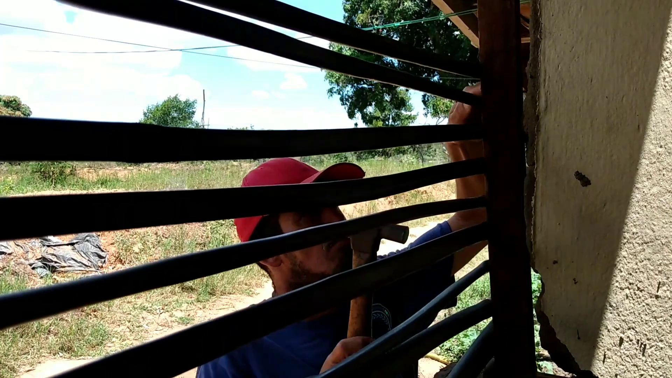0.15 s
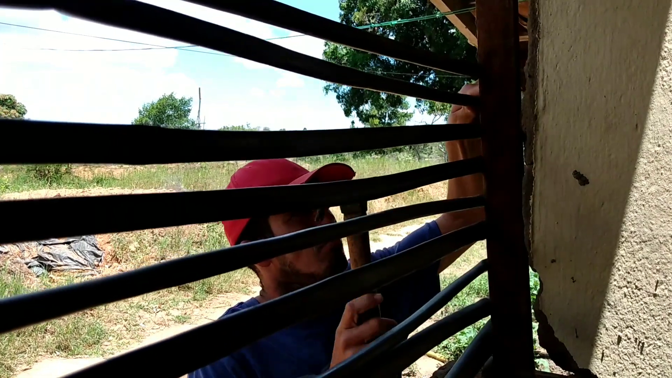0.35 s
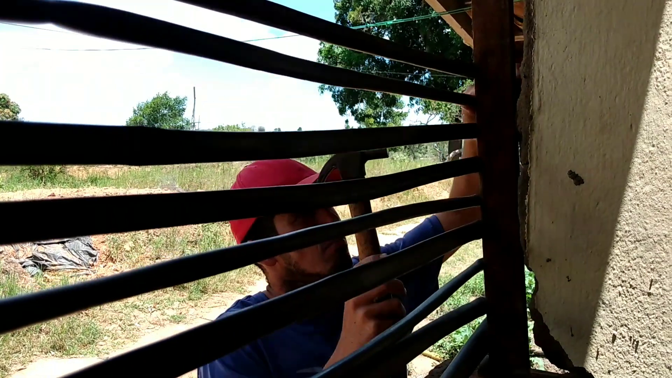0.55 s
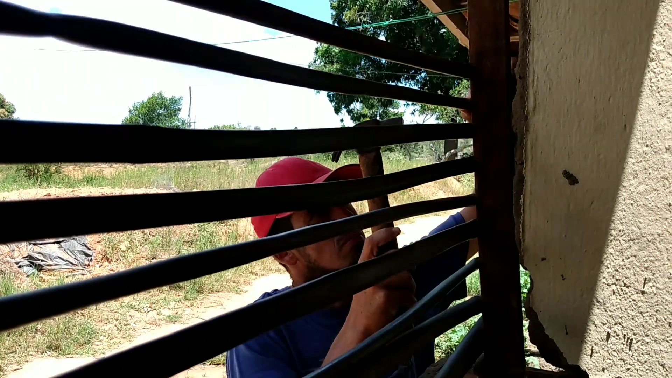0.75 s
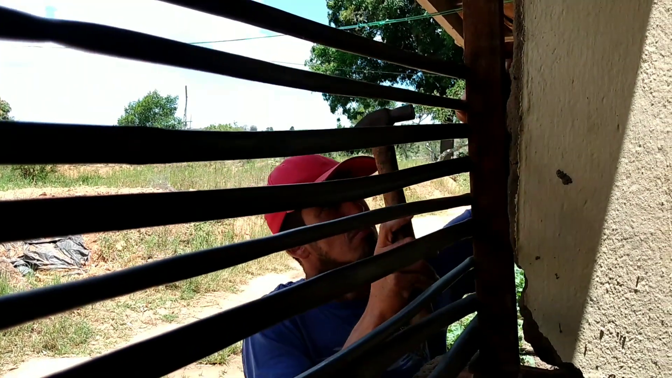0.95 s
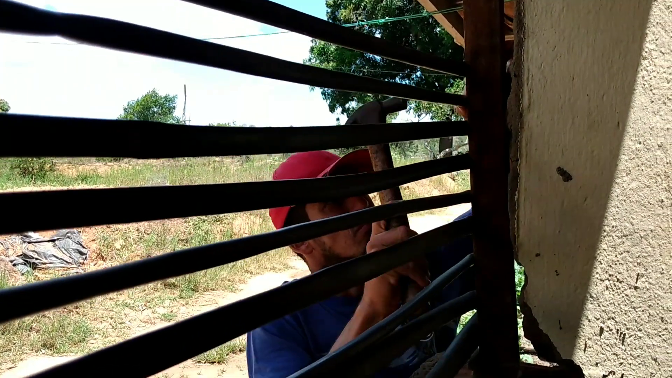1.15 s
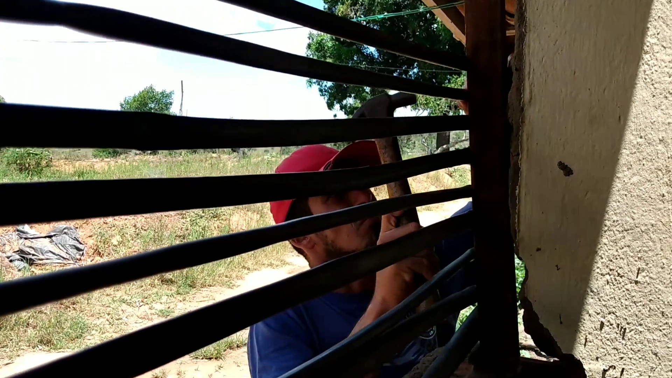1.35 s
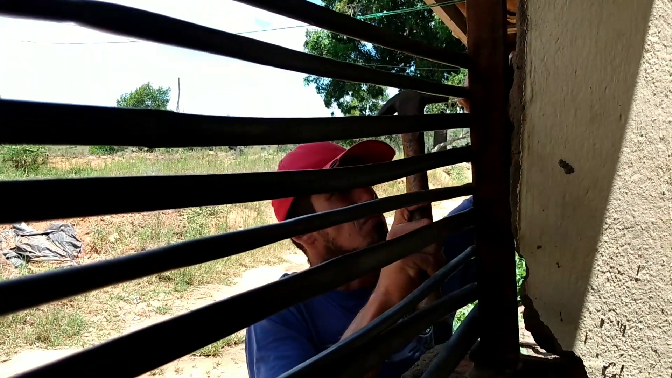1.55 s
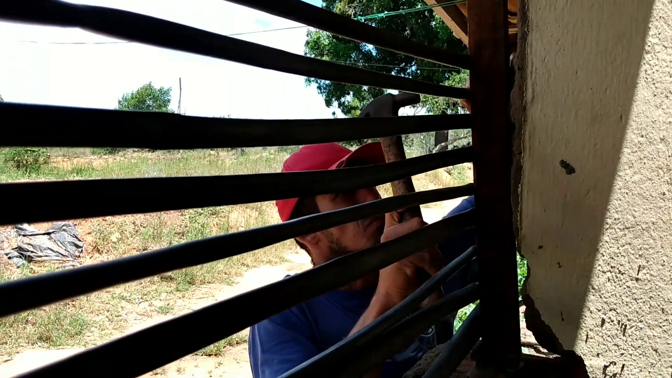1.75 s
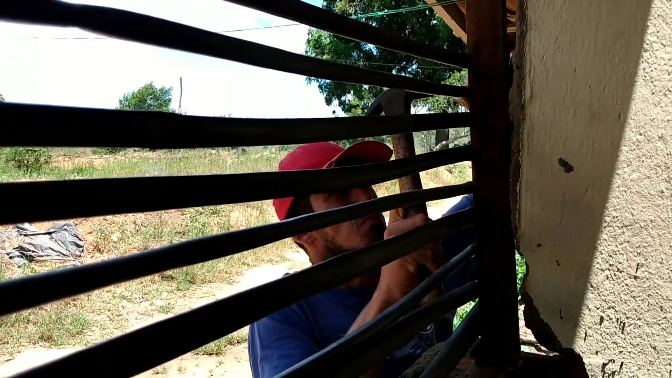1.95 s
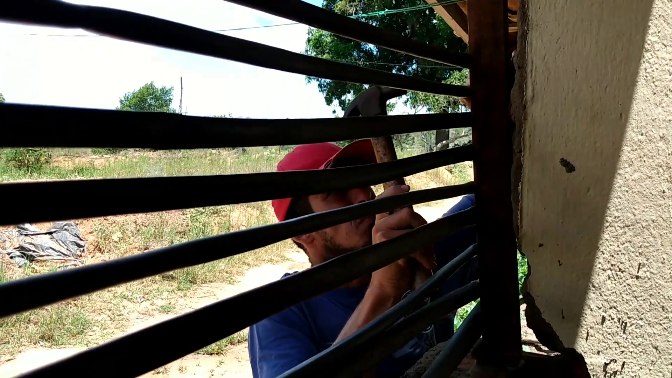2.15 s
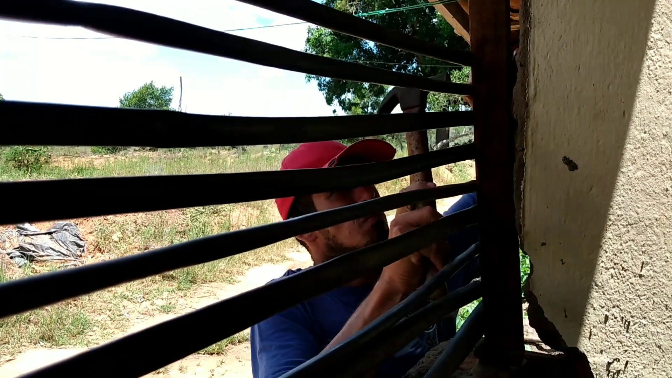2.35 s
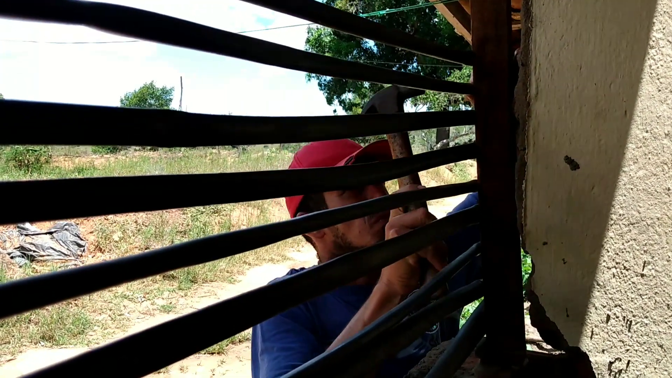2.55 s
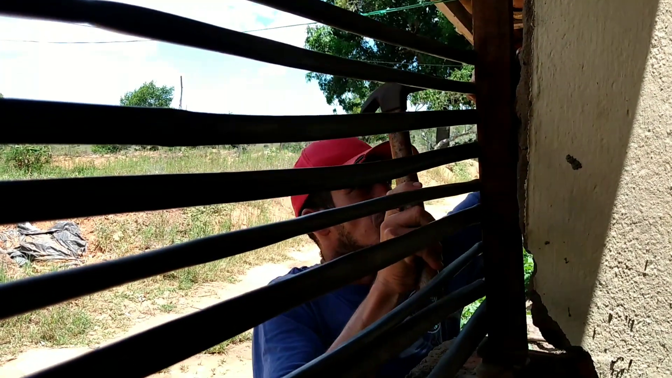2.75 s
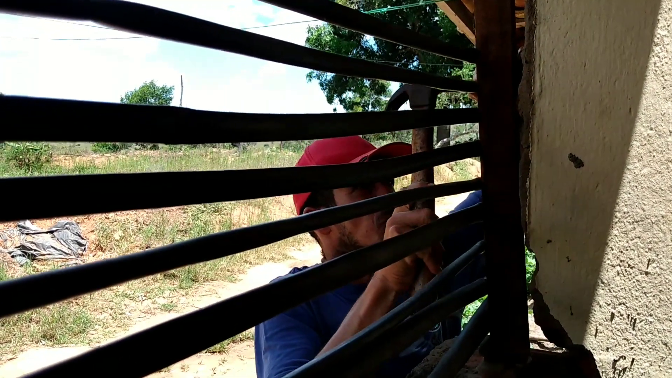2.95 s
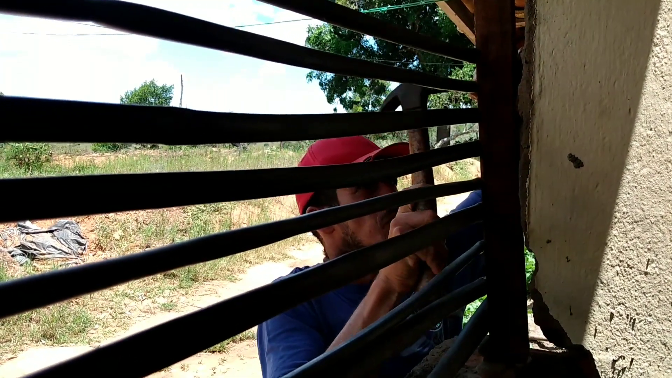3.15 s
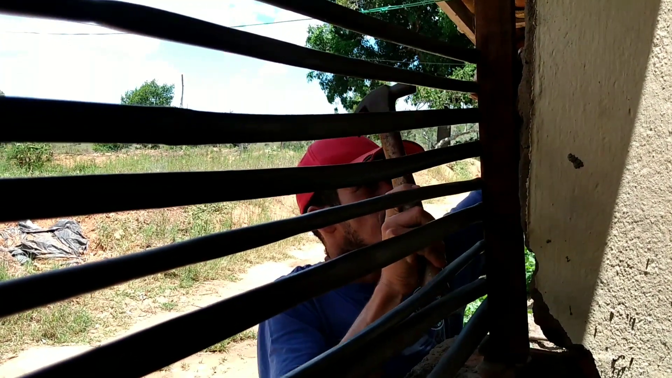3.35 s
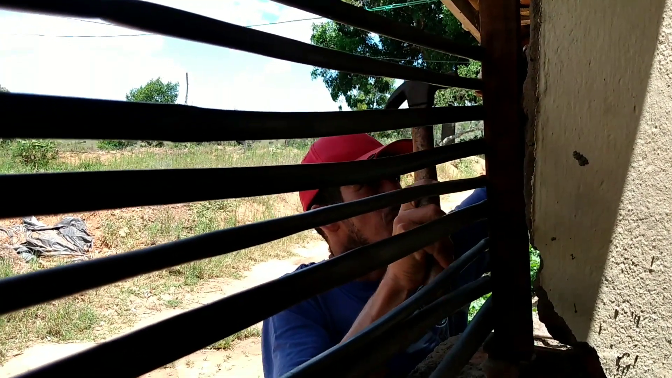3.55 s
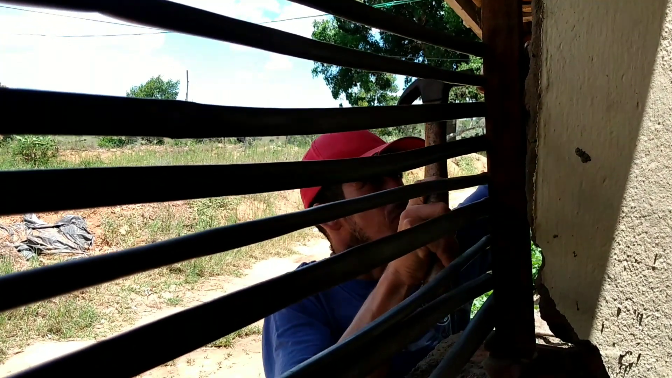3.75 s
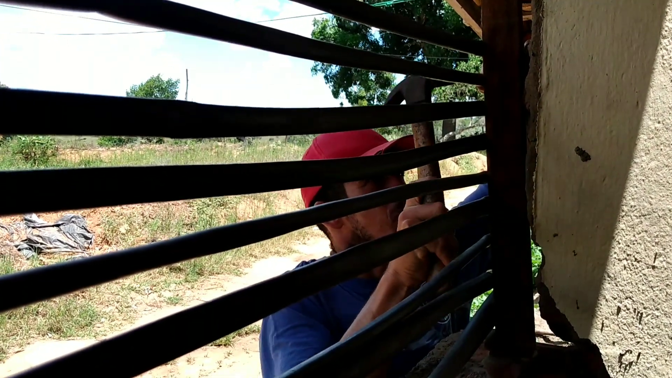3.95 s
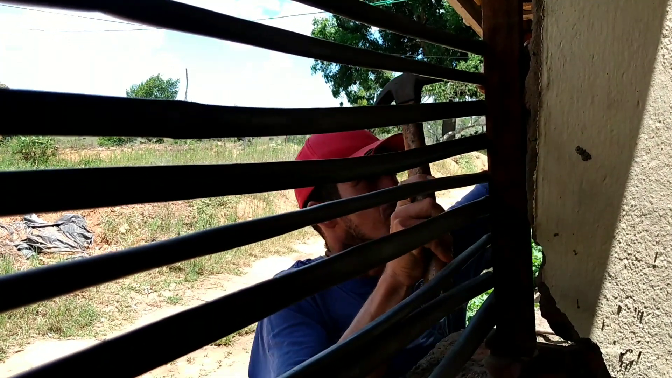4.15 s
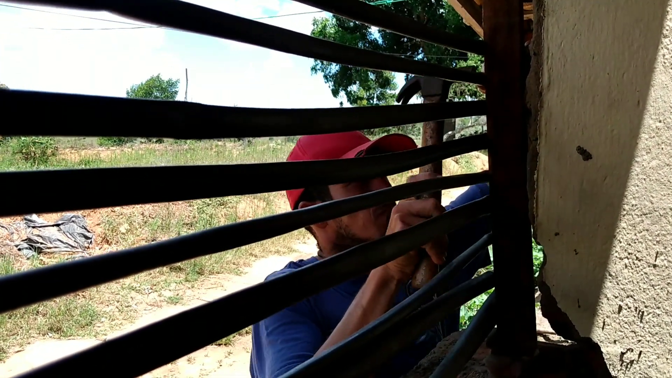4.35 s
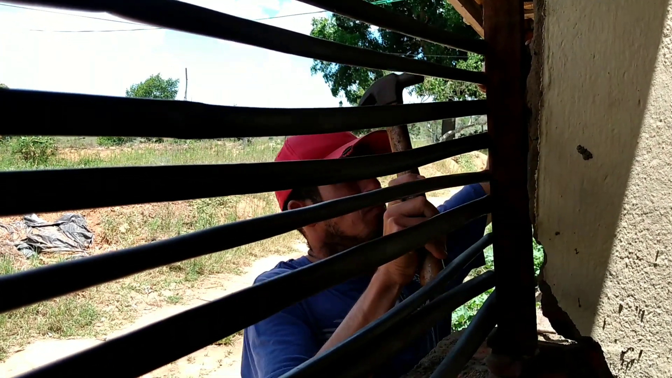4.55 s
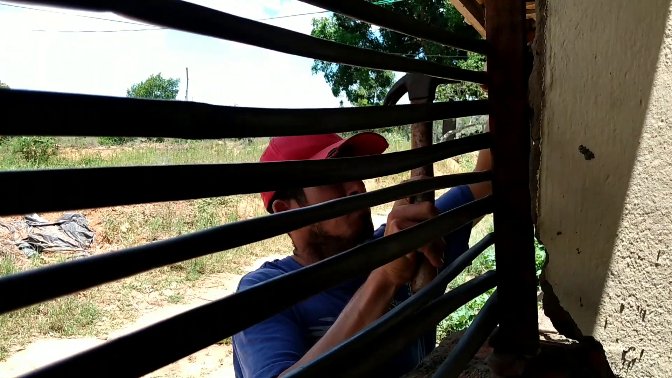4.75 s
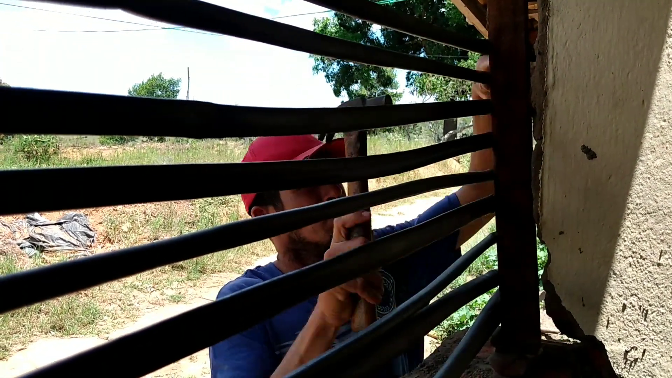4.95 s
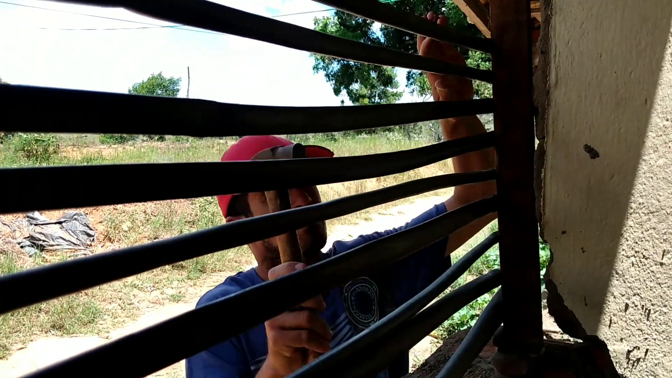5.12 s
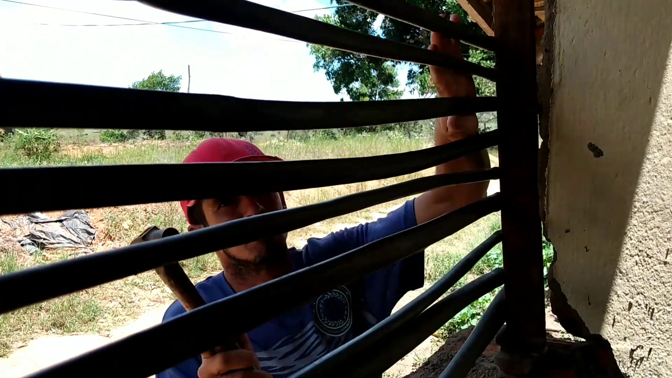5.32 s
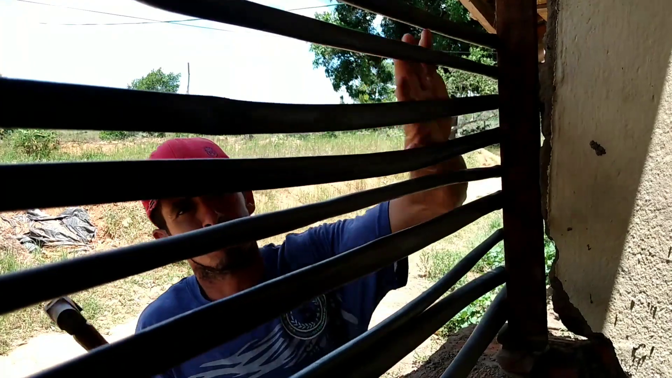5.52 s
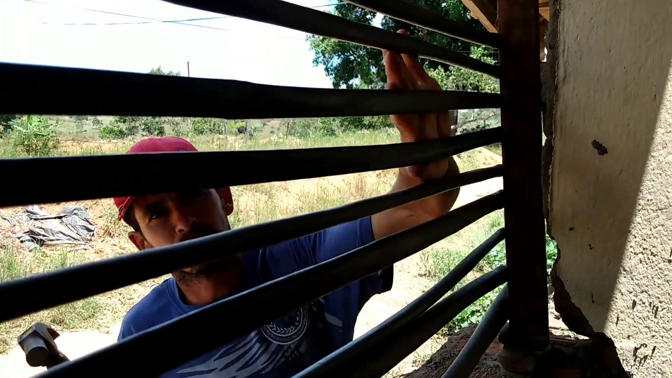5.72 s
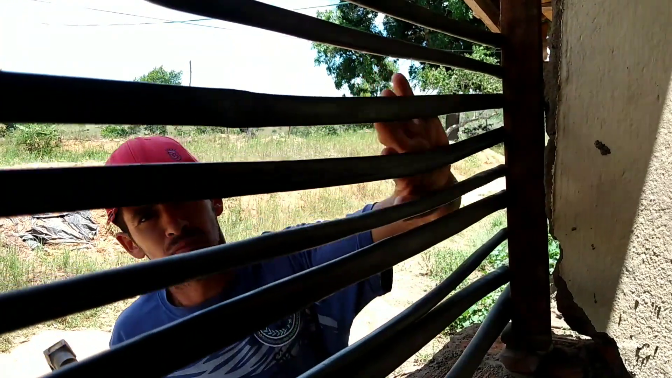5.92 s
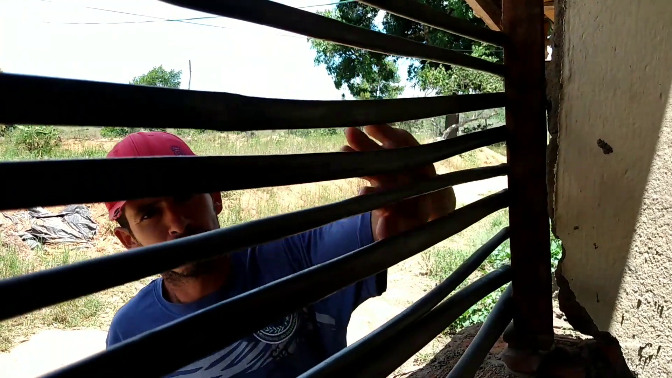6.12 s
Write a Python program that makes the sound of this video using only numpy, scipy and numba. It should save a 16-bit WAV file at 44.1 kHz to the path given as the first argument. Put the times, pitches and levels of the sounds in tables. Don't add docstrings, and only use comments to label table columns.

```python
import sys
import numpy as np
from scipy import signal
from scipy.fft import rfft, irfft
from scipy.io import wavfile
from scipy.ndimage import uniform_filter1d
from numba import njit

SR = 44100
rng = np.random.default_rng(int(sys.argv[2]) if len(sys.argv) > 2 else 0)


def magnitude_from_level(level_db):
    exponent = np.asarray(level_db, float) / 20
    return 10 ** exponent


def output_pcm(signal):
    pcm = np.clip(np.atleast_2d(signal).T, -1, 1) * 32767
    wavfile.write(sys.argv[1], SR, np.round(pcm).astype(np.int16))


N = 272538
TIME = np.arange(N) / SR

# pitch_hz, density_db (per Hz)
QUIET = [(71, -4), (120, -9), (289, -4.5), (436, -9.5), (473, -5), (1260, -13), (2200, -17.5),
         (3240, -22.5), (11300, -17), (16000, -24)]
QUIET_DB = -62.5
# pitch_hz, density_db (per Hz)
LEAVES = [(100, -6.5), (300, -6), (900, -7.5), (1500, -8), (2300, -7.5), (3400, -7.5), (4800, -5.5),
          (6600, -5.5), (8200, -9), (10800, -5.5), (14000, -13.5), (16000, -11)]
# start_s, length_s, level_db, treble_over_level_db
RUSTLES = [(0, .28, -52, -4.5), (.08, 0.042, -49, -3), (.2, 0.053, -48, -6.5), (.72, .5, -58.5, -15),
           (1.5, .3, -59.5, -17), (0.495, 0.21, -55, -13.5), (0.964, 0.057, -54.5, -11),
           (1.415, 0.05, -51.5, -7), (2.556, 0.025, -54, -13), (1.74, 0.026, -54.5, -12),
           (1.901, 0.21, -52.5, -11), (3.13, 1.78, -53, -13), (4.164, 0.26, -51, -5.5)]
RUSTLE_RISE_DB_S, RUSTLE_FALL_DB_S, STILL_DB, STILL_TREBLE_DB = 113, 160, -67.5, -77
SHIVER_DB, SHIVER_TREBLE_DB = -55, -56.5
SHIVER_FALL_DB_S, SHIVER_TREBLE_FALL_DB_S = 45, 170
# pitch_hz, left_minus_right_db
HISS_BALANCE = [(60, 18), (110, 16), (200, 0.5), (380, -4.5), (700, -5), (1290, -7.5), (2380, -12),
                (4400, -11.5), (8120, -15.5), (15000, -9.5)]

# start_s, length_s, level_db
LEFT_GUSTS = [(0, 0.076, -52), (.22, 0.066, -59), (0.486, 0.047, -49.5), (0.602, 0.072, -48.5),
              (0.88, 0.089, -48), (1.108, 0.034, -57.5), (1.383, 0.095, -57.5), (1.655, 0.083, -51.5),
              (1.856, 0.24, -42.5), (2.483, 0.064, -47), (2.757, 0.18, -56.5), (3.094, 0.43, -37.5),
              (3.568, 0.091, -34.5), (3.765, .17, -26.5), (3.952, 0.25, -24), (4.252, 0.1, -28.5),
              (4.43, 0.11, -29.5), (4.593, 0.046, -30), (4.708, 0.11, -41), (5.175, 0.11, -55.5),
              (5.38, 0.36, -57), (5.868, 0.0098, -46), (5.971, 0.26, -41)]
RIGHT_GUSTS = [(0, .33, -57), (.45, 0.32, -62), (.87, .28, -61), (1.4, .3, -63), (1.85, .28, -57),
               (2.48, 0.054, -53.5), (2.78, 0.057, -50), (3.15, 0.27, -53), (3.45, 0.017, -46),
               (3.58, 0.081, -40), (3.861, .26, -38), (4.2, 0.16, -36.5), (4.36, 0.12, -39.5),
               (4.6, 0.012, -36.5), (4.78, 0.041, -37), (5.2, .98, -59), (5.45, 0.26, -57)]
GUST_RISE_DB_S, GUST_FALL_DB_S, CALM_DB = 282, 253, -65
# centre_s, level_db, pitch_hz, crest_db
LEFT_EDDIES = [(.503, -44, 78.6, -19), (0.604, -39, 100, -19), (0.96, -33.5, 76, -24.5),
               (1.846, -37, 111, -35), (1.895, -28.5, 84, -48), (2.083, -36, 132, -22),
               (2.55, -40, 86, -44), (3.2, -24.5, 113, -64), (3.231, -22, 110, -81),
               (3.753, -16.5, 115, -25.5), (3.771, -14.5, 179.3, -29.5), (3.866, -17, 191.5, -13),
               (3.882, -11.5, 211, -25.5), (3.902, -15, 87, -15), (3.941, -31.5, 161, -4.5),
               (3.985, -20.5, 133, -12.5), (3.997, -21.5, 132, -5), (4.133, -15.5, 153, -11.5),
               (4.122, -18.5, 158.6, -7.5), (4.17, -13.5, 93, -19.5), (4.189, -17.5, 183, -6),
               (4.257, -16, 147, -18), (4.291, -21.5, 167, -17), (4.433, -12.5, 153, -32),
               (4.451, -19.5, 155, -26), (4.522, -18, 104, -27), (4.536, -21, 160, -21),
               (4.598, -22, 138, -18.5), (4.625, -17, 135, -27), (6.056, -25.5, 76, -34)]
RIGHT_EDDIES = [
    (3.447, -35, 76.6, -38),
    (4.008, -23, 112, -42),
    (4.061, -20, 86, -42),
    (4.212, -21, 84, -40),
    (4.28, -10, 105, -37),
    (4.604, -31, 98, -35),
]
SHED_PER_S, SHED_OVER_GUST_DB, SHED_SCATTER_DB, SHED_HZ, SHED_CREST_DB = 45, 1.5, 5, 93, -30

# start_s, tick_db (steel), knock_db (wood), thud_db (hollow)
BLOWS = [(0.4535, -65, -82, -83), (1.131, -46, -71, -82), (1.654, -43, -60.5, -68),
         (2.0008, -36, -52.5, -52.5), (2.432, -36, -47, -46), (2.718, -29, -41.5, -35.5),
         (3.008, -27.5, -30.5, -29.5), (3.283, -18.5, -23, -24), (3.552, -17, -21, -21.5),
         (3.8187, -17.5, -20.5, -21.5), (4.092, -18.5, -21, -21), (4.3791, -18, -20.5, -22),
         (4.7396, -17, -20, -22)]
# pitch_hz, level_db, t60_s
STEEL = [(8600, -3, .003), (10700, -1, .004), (12600, 1, .003), (14800, 1, .002)]
POST = [(1000, 0, .012), (1300, -1, .008), (1550, -1, .01), (2150, 0, .008), (3020, -2, .016),
        (3800, -7, .005)]
HOLLOW = [(283.7, -4, 0.045), (485, -4.5, 0.026), (673, 2.5, 0.023)]
PLANK = [(165, -1.2, 0.053), (332, -0.72, 0.063)]
PLANK_TOP_DB = -36.5
# pitch_hz, level_db
STEEL_TAIL = [(4000, -30), (6500, -13), (8600, -11), (10700, -2), (13000, -5), (15300, -9), (16000, -40)]
POST_TAIL = [(500, -25), (950, 0), (1500, -2), (1750, -6), (2200, -1), (3100, -4), (4200, -9), (6000, -14),
             (9000, -30)]
HOLLOW_TAIL = [(120, -23.5), (200, -1.5), (300, -3), (470, -1.5), (700, 1.5), (950, -2.5), (1600, -28.5)]
PLANK_TAIL = [(90, -21), (170, 3), (330, 3), (520, -18)]
# delay_s, left_db, right_db
TICK_ECHOES = [(0, 6, 0), (.0024, -3, -1), (.0145, -18, -10), (.0195, -16, -10), (.0485, -17, -12)]
# delay_s, left_db, right_db
KNOCK_ECHOES = [(0, 6, 0), (.0024, -5, -4), (.0052, -8, -4), (.008, -8, -3), (.0275, -8, -5),
                (.031, -10, -8), (.041, -12, -12)]
# pitch_hz, t60_s
YARD = [(250, 0.34), (500, 0.29), (1000, 0.25), (2000, 0.33), (4000, 0.25), (8000, 0.25), (14000, 0.17)]
LEAD = 132
# pitch_hz, left_minus_right_db
BLOW_BALANCE = [(60, 15), (110, -19), (200, -13), (380, -2.5), (700, -5), (1290, -8), (2380, -4),
                (4400, -8.5), (8120, -18.5), (15000, -7)]

# start_s, level_db, treble_over_level_db
SCUFF = [
    (5.07, -60, -12),
    (5.15, -52, -9),
    (5.255, -45, -9.5),
    (5.3, -48.5, -3.5),
    (5.36, -43.5, -3.5),
    (5.399, -36.5, -5.5),
    (5.46, -42, -0.5),
    (5.58, -48, -4),
    (6.18, -54.5, -12),
]
SOLE_HZ, SOLE_WIDTH_HZ, SOLE_DB = 2340, 780, -0.5
# start_s, level_db
GRIT = [
    (5.236, -38),
    (5.2485, -33),
    (5.3724, -30),
    (5.3837, -30),
    (5.3905, -24.5),
    (5.3992, -20),
    (5.4034, -25),
    (5.4103, -25),
    (5.4134, -29),
    (5.4894, -33),
]
# pitch_hz, level_db, t60_s
STONE = [(2270, 3, 0.0054), (3370, -1, 0.0047), (6600, 1, 0.003), (11300, 0.5, 0.0031)]


def unit(x):
    return x / np.sqrt(np.mean(x ** 2))


def colour(x, table, share=1):
    hz, db = np.transpose(table)
    grid = np.fft.rfftfreq(2048, 1 / SR) + 1
    log_gain = share * np.interp(np.log(grid), np.log(hz), db) * np.log(10) / 20
    cepstrum = irfft(log_gain)
    cepstrum[1:1024] *= 2
    cepstrum[1025:] = 0
    response = irfft(np.exp(rfft(cepstrum)))
    return signal.oaconvolve(x, response)[:len(x)]


def band(x, lo_hz, hi_hz):
    edges = [lo_hz, min(hi_hz, .45 * SR)]
    return signal.sosfilt(signal.butter(2, edges, "band", fs=SR, output="sos"), x)


def pair(size, join_hz=800, lag=0):
    noise = rng.standard_normal((3, size))
    low = signal.butter(1, join_hz, "low", fs=SR, output="sos")
    high = signal.butter(1, join_hz, "high", fs=SR, output="sos")
    shared = [noise[0], np.roll(noise[0], lag)]
    return signal.sosfilt(low, shared) + signal.sosfilt(high, noise[1:])


def walk(rate):
    k = int(SR / rate)
    held = np.repeat(rng.standard_normal(N // k + 1), k)
    return unit(uniform_filter1d(uniform_filter1d(held, k), k)[:N])


def add(track, s, sound):
    i = max(int(s * SR), 0)
    track[i:i + len(sound)] += sound[:len(track) - i]


def ring(modes, chance, scatter_db, detune, push_s=.0001):
    t = TIME[:4096, None]
    hz, db, t60 = np.transpose(modes)
    count = len(hz)
    size = magnitude_from_level(db + scatter_db * chance[0, :count]) * (-1) ** np.arange(count)
    fade = 1000. ** (-t / t60) * (1 - np.exp(-t / push_s))
    swing = np.sin(2 * np.pi * hz * (1 + detune * chance[1, :count]) * t)
    return (size * swing * fade).sum(axis=1)


def swells(start_s, length_s, db, rise_db_s, fall_db_s, still_db):
    t = TIME[::64, None]
    rise_db = rise_db_s * np.maximum(start_s - t, 0)
    fall_db = fall_db_s * np.maximum(t - start_s - length_s, 0)
    shape = db - rise_db - fall_db
    return np.interp(TIME, t[:, 0], np.maximum(shape.max(axis=1), still_db))


def ports(pair_of, balance):
    return np.array([colour(pair_of[0], balance, share=.5), colour(pair_of[1], balance, share=-.5)])


def hush():
    noise = pair(N, join_hz=890, lag=17.6)
    return magnitude_from_level(QUIET_DB) * unit(np.array([colour(v, QUIET) for v in noise]))


def stirring():
    s, length_s, db, treble_db = np.transpose(RUSTLES)
    blow_s = np.transpose(BLOWS)[0]
    scuff_s, scuff_db, scuff_treble_db = np.transpose(SCUFF)
    middle = [swells(s, length_s, db, RUSTLE_RISE_DB_S, RUSTLE_FALL_DB_S, STILL_DB),
              swells(blow_s, 0.017, SHIVER_DB, 3000, SHIVER_FALL_DB_S, STILL_DB),
              np.interp(TIME, scuff_s, scuff_db)]
    treble = [swells(s, length_s, db + treble_db, RUSTLE_RISE_DB_S, RUSTLE_FALL_DB_S, STILL_TREBLE_DB),
              swells(blow_s, 0.0042, SHIVER_TREBLE_DB, 3600, SHIVER_TREBLE_FALL_DB_S, STILL_TREBLE_DB),
              np.interp(TIME, scuff_s, scuff_db + scuff_treble_db, left=STILL_TREBLE_DB)]
    return np.max(middle, axis=0), np.max(treble, axis=0)


def leaves():
    middle_db, treble_db = stirring()
    hiss = 0
    for lo_hz, hi_hz, db in [(100, 1220, middle_db - 3.0), (1220, 4050, middle_db),
                             (6000, 25000, treble_db + 0.5)]:
        grain = unit(magnitude_from_level(np.minimum(3.2 * rng.exponential(size=N), 15)))
        flicker_db = walk(27)
        hiss = hiss + magnitude_from_level(db + flicker_db) * band(grain * pair(N, join_hz=900, lag=14.3), lo_hz, hi_hz)
    return magnitude_from_level(13.5) * np.array([colour(v, LEAVES) for v in hiss])


@njit
def lowpass(x, hz):
    y, b, l = np.empty(len(x)), 0., 0.
    for i in range(len(x)):
        g = np.tan(np.pi * hz[i] / SR)
        v = (b + g * (x[i] - l)) / (1 + g * (g + 1.4))
        y[i] = l + g * v
        b, l = 2 * v - b, 2 * y[i] - l
    return y


def eddy(db, hz, crest_db):
    t = TIME[:4096] - TIME[2048]
    swing = np.cos(2 * np.pi * hz * t) * np.exp(-(t * hz / 0.36) ** 2)
    crest = magnitude_from_level(crest_db + 20) * (1 - (t / 0.0033) ** 2) / (1 + (t / 0.00088) ** 2) ** 2
    churn = magnitude_from_level(crest_db + 12.0) * band(rng.standard_normal(4096), 153, 470) * np.exp(-(t / 0.0085) ** 2)
    push = 1 if crest_db > -25.5 else -1
    return push * magnitude_from_level(db + 5.5) * (swing + crest + churn)


def rumble(gust_db):
    flutter = magnitude_from_level(3 * np.clip(walk(40), -3, 1))
    corner_hz = np.clip(75 * magnitude_from_level(0.16 * (gust_db + 49)), 40, 400)
    noise = lowpass(rng.standard_normal(N), corner_hz) / np.sqrt(corner_hz)
    return magnitude_from_level(gust_db + 7.0) * flutter * unit(lowpass(noise, 4.1 * corner_hz))


def wind():
    out = np.zeros((2, N))
    centre_s = TIME[2048]
    for track, gusts, eddies in zip(out, (LEFT_GUSTS, RIGHT_GUSTS), (LEFT_EDDIES, RIGHT_EDDIES)):
        gust_db = swells(*np.transpose(gusts), GUST_RISE_DB_S, GUST_FALL_DB_S, CALM_DB)
        track += rumble(gust_db)
        for s, db, hz, crest_db in eddies:
            add(track, s - centre_s, eddy(db, hz, crest_db))
        chance = rng.standard_normal((400, 4))
        shed_s = np.cumsum(magnitude_from_level(4 * chance[:, 0]) / SHED_PER_S)
        for s, (_, size, pitch, sharp) in zip(shed_s, chance):
            db = np.interp(s, TIME, gust_db)
            if .05 < s < N / SR and db > -56:
                hz = SHED_HZ * magnitude_from_level(0.2 * (db + 32) + 1.5 * pitch)
                shed_db = db + SHED_OVER_GUST_DB + SHED_SCATTER_DB * size
                add(track, s - centre_s, eddy(shed_db, hz, SHED_CREST_DB + 6 * sharp))
    return out


def hammer():
    _, tick_db, knock_db, thud_db = np.transpose(BLOWS)
    boom_db = np.minimum(thud_db, PLANK_TOP_DB)
    tails = yard(), yard(), yard()
    tick = struck(tick_db + 3, .0012, STEEL, TICK_ECHOES, tails, STEEL_TAIL,
                  tail_db=-3, swell_s=.004, light_tilt=.3)
    knock = struck(knock_db + 7.5, .0022, POST, KNOCK_ECHOES, tails, POST_TAIL, tail_db=4, swell_s=.012)
    thud = struck(thud_db + 5, .002, HOLLOW, KNOCK_ECHOES, tails, HOLLOW_TAIL, tail_db=11, swell_s=.024)
    boom = struck(boom_db, .002, PLANK, KNOCK_ECHOES, tails, PLANK_TAIL, tail_db=16.5, swell_s=0.058)
    return tick + knock + thud + boom


def struck(levels_db, late_s, modes, echoes, tails, tail_colour, tail_db, swell_s, light_tilt=0):
    rings, impacts = np.zeros(N), np.zeros((3, N))
    for (s, *_), db in zip(BLOWS, levels_db):
        chance = rng.standard_normal((3, 8))
        lightness_db = min(levels_db.max() - db, 14)
        tilt_db = light_tilt * lightness_db * 2
        tilted = [(hz, g + tilt_db * np.log2(hz / modes[1][0]), t60) for hz, g, t60 in modes]
        add(rings, s + late_s, magnitude_from_level(db) * ring(tilted, chance, 1.8, .012, push_s=swell_s / 40))
        soft_db = -(.15 + light_tilt) * lightness_db
        angle = 3 * chance[2, 0]
        shares = np.array([.7, .7 * np.cos(angle), .7 * np.sin(angle)])
        impacts[:, int((s + late_s) * SR) - LEAD] = magnitude_from_level(db + soft_db + tail_db) * shares
    swell = 1 - .5 * np.exp(-(TIME[:SR // 2] / swell_s) ** 2)
    out = np.zeros((2, N))
    for impact, tail in zip(impacts, tails):
        coloured = [colour(v * swell, tail_colour) for v in tail]
        out += signal.oaconvolve(impact[None], coloured, axes=1)[:, :N]
    dulled = signal.sosfilt(signal.butter(6, 14000, fs=SR, output="sos"), rings)
    for s, left_db, right_db in echoes:
        source = rings if s < .01 else dulled
        out += magnitude_from_level(np.array([[left_db], [right_db]])) * np.roll(source, int(s * SR))
    return out


def yard():
    t = TIME[:SR // 2] - LEAD / SR
    limit = signal.ellip(8, .2, 50, 15900, fs=SR, output="sos")
    noise = signal.sosfilt(limit, pair(len(t), join_hz=700))
    swell = np.exp(np.minimum(t, 0) / .0015)
    out = 0
    for k, (hz, t60) in enumerate(YARD):
        octave = (-1) ** k * band(noise, hz / 1.284, hz * 1.603)
        out = out + octave * swell * 1000. ** (-t / t60)
    return out


def sole():
    scuff_s, scuff_db, _ = np.transpose(SCUFF)
    crumbs = unit(magnitude_from_level(np.minimum(4.5 * rng.exponential(size=N), 24))) * rng.standard_normal(N)
    song = band(crumbs, SOLE_HZ - SOLE_WIDTH_HZ / 2, SOLE_HZ + SOLE_WIDTH_HZ / 2)
    level_db = np.interp(TIME, scuff_s, scuff_db, left=-90) + SOLE_DB + 2.4 * walk(50)
    return magnitude_from_level(13.5) * colour(magnitude_from_level(level_db) * song, LEAVES)


def grit():
    out = np.zeros(N)
    for s, db in GRIT:
        add(out, s, magnitude_from_level(db - 3.5) * ring(STONE, rng.standard_normal((2, 4)), 2.5, 0.054))
    return out


def scene():
    limit = signal.ellip(8, .2, 50, 15800, fs=SR, output="sos")
    soft = signal.sosfilt(limit, hush() + leaves() + sole() + grit())
    return ports(soft, HISS_BALANCE) + wind() + ports(hammer(), BLOW_BALANCE)


def roll_off(x):
    return signal.sosfilt(signal.butter(12, 16960, fs=SR, output="sos"), x)


def record(dry):
    cut = signal.sosfilt(signal.cheby1(3, 1.5, 58, "high", fs=SR, output="sos"), dry)
    rounded = np.tanh(0.71 * cut) / 1.025
    top = signal.ellip(8, .2, 70, 16700, fs=SR, output="sos")
    return roll_off(signal.sosfilt(top, rounded))


dry = scene()
out = record(dry)
output_pcm(out)
```